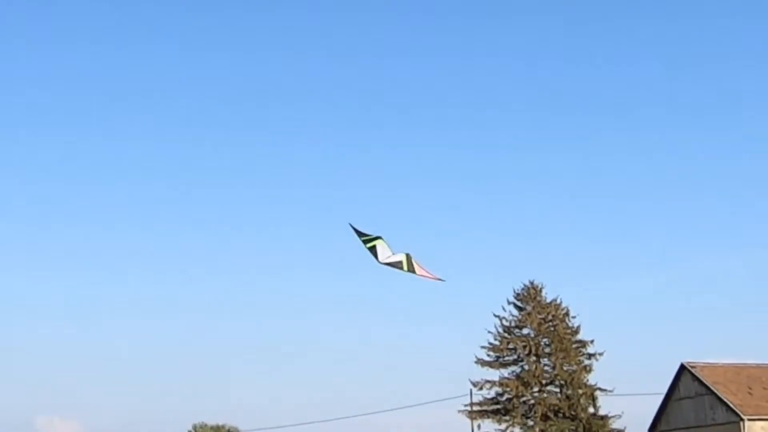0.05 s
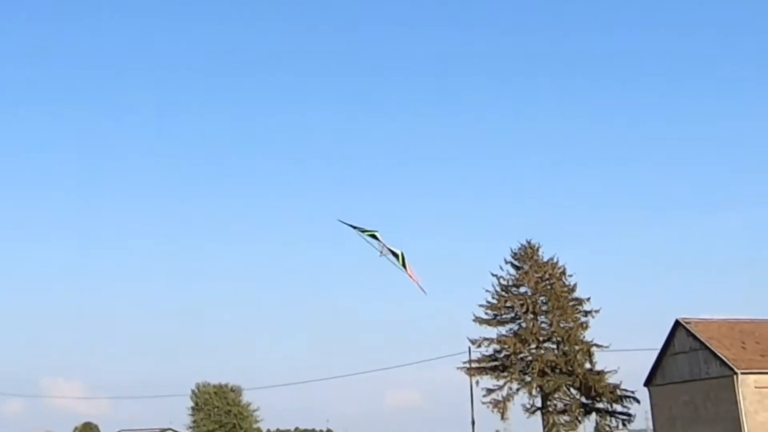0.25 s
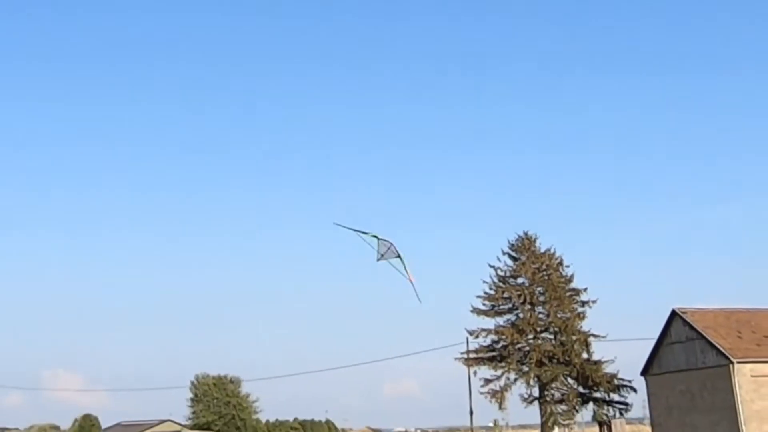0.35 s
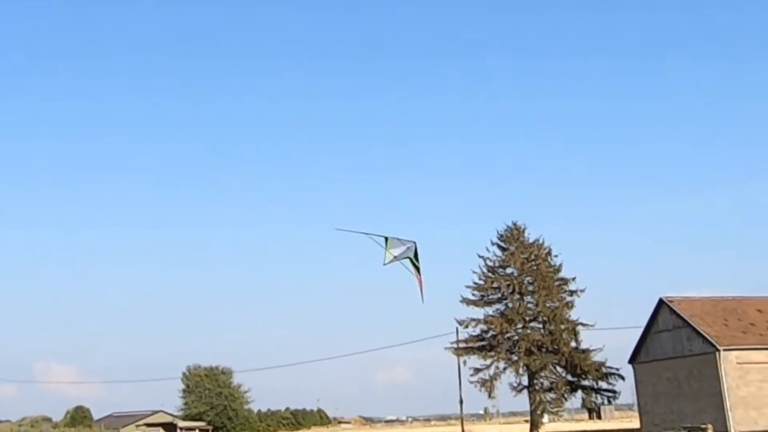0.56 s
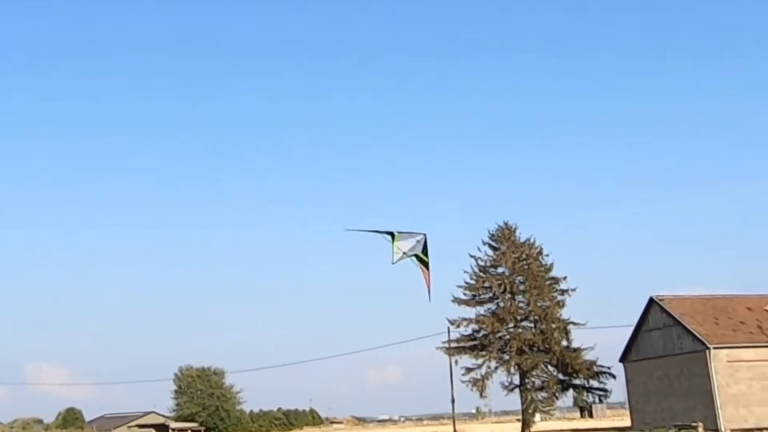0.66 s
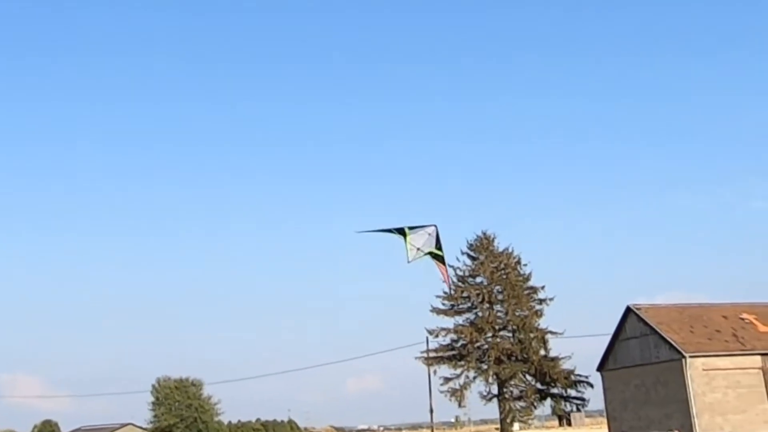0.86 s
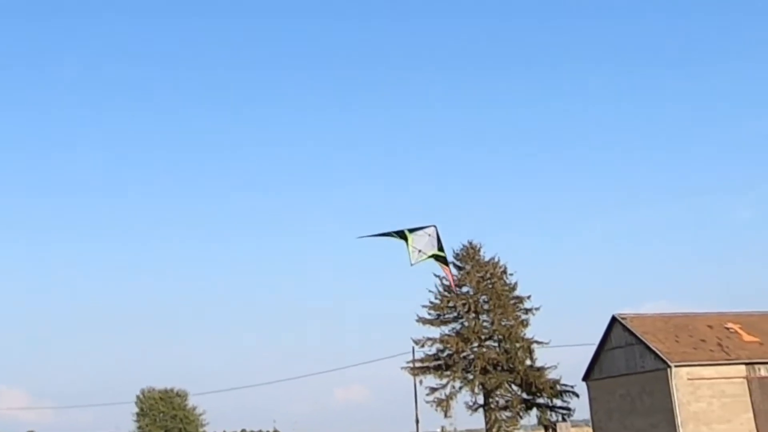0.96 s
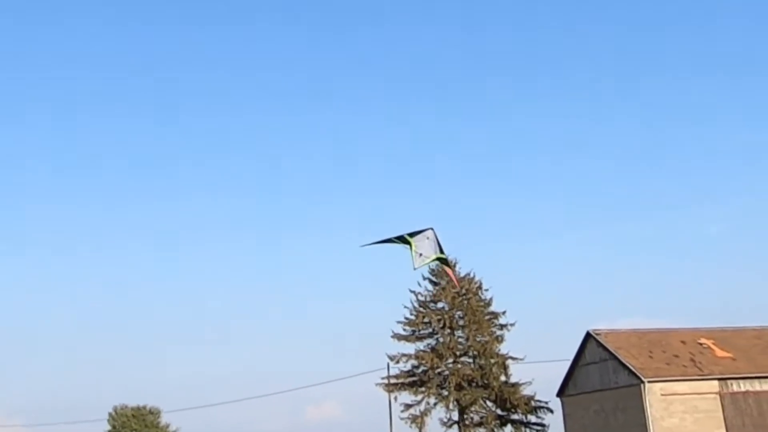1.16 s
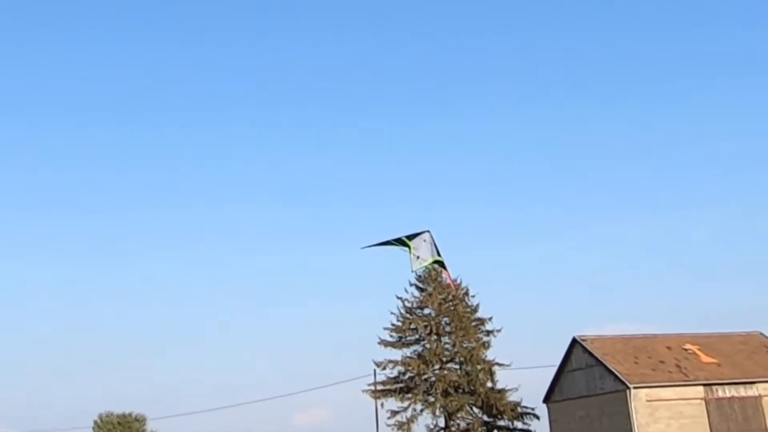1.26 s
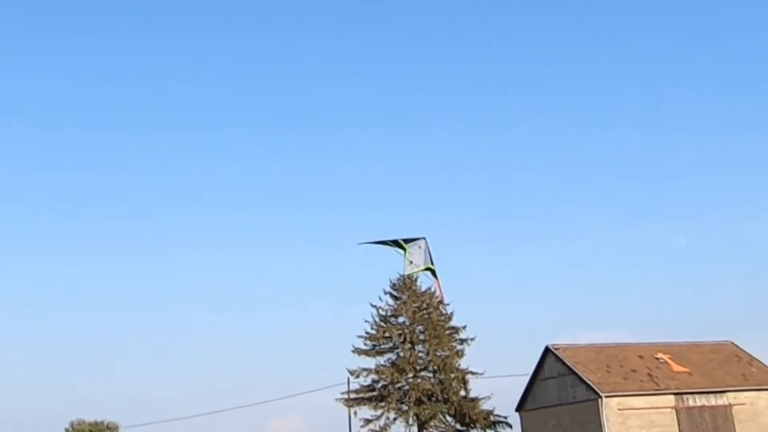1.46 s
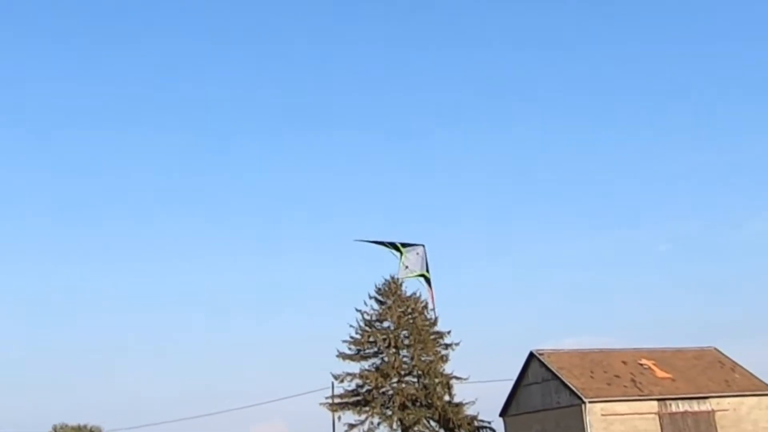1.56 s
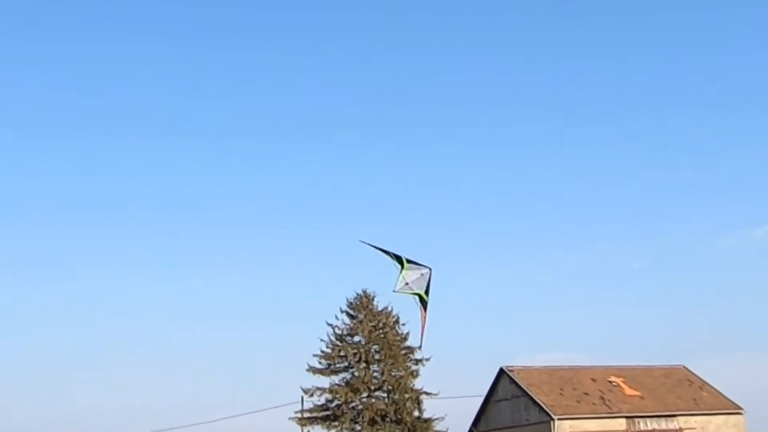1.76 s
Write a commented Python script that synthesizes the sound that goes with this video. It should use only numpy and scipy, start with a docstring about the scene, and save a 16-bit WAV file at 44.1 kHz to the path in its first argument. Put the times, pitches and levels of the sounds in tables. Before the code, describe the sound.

A stunt kite flutters over an open field, with wind buffeting the microphone.

```python
"""A stunt kite turns over an open field: its fabric rustles in swells, flaps, billows and ticks once,
and a faint whirr, probably the taut lines, sinks in pitch. Down at the microphone, gusts buffet
with a rumble that brightens as the eddies pass faster, and single eddies thump.
Faint air over the field lies behind it all."""
import sys
import numpy as np
from scipy import signal
from scipy.io import wavfile
from scipy.ndimage import uniform_filter1d

SR = 44100
rng = np.random.default_rng(int(sys.argv[2]) if len(sys.argv) > 2 else 0)


def to_wav(sig):
    """Store sig (one row per channel, or 1-D mono) as 16-bit WAV at the path in sys.argv[1].

    Samples outside -1..1 are clipped; the rate is SR.
    """
    pcm = np.clip(np.atleast_2d(sig), -1, 1) * 32767
    pcm = np.round(pcm).astype(np.int16)
    wavfile.write(sys.argv[1], SR, pcm.T)  # frames by channels


N = 79380


def from_db(db):
    return 10 ** (np.asarray(db) / 20)


def rms_one(x):
    return x / np.sqrt(np.mean(x ** 2) + 1e-20)


def in_time(rows):
    """Join rows of (t/s, values...) by straight lines: one curve for each value column."""
    times, *columns = np.transpose(rows)
    return [np.interp(np.arange(N) / SR, times, column) for column in columns]


def butter(x, hz, kind, order=2):
    """Plain low-, high- or band-pass."""
    return signal.sosfilt(signal.butter(order, hz, kind, fs=SR, output="sos"), x)


def drift(rate_hz):
    """A slow random wander with rms 1."""
    hop, settle = 40, 2000
    pole = np.exp(-2 * np.pi * rate_hz * hop / SR)
    noise = rng.standard_normal(N // hop + settle + 2)
    slow = signal.lfilter([1], [1, -2 * pole, pole * pole], noise)[settle:]
    return np.interp(np.arange(N) / hop, np.arange(len(slow)), rms_one(slow))


def resonate(x, hz, width_hz):
    """A resonance with gain 1 at its peak."""
    radius = np.exp(-np.pi * width_hz / SR)
    feedback = [1, -2 * radius * np.cos(2 * np.pi * hz / SR), radius ** 2]
    return signal.lfilter(np.array([1, 0, -1]) * (1 - radius ** 2) / 2, feedback, x + 1e-18)


def coloured(excitations, spectrum, patchy_db, flicker_hz):
    """Two unrelated excitations dealt to narrow bands, each with its own level and flicker; rms 1."""
    edges_hz = np.geomspace(150, 13000, 25)
    hz, db = np.transpose(spectrum)
    out = 0
    for k, (low, high) in enumerate(zip(edges_hz, edges_hz[1:])):
        level_db = np.interp(np.log(low * high) / 2, np.log(hz), db)
        band = butter(excitations[k % 2], [low, high], "band")
        out = out + from_db(level_db + patchy_db * drift(flicker_hz)) * band
    return rms_one(out)


def field_air():
    """Air over the open field: a faint bed of noise whose colour slowly shifts."""
    # spectral density of the air: f/Hz, relative level/dB
    spectrum = [(150, 7.5), (260, 9.5), (380, 10), (520, -21.5), (700, 1), (1000, 0), (2000, -5.5),
                (3200, -13.5), (4800, -28), (6300, -34), (7800, -41), (10000, -28.5), (12000, -49)]
    return from_db(-56.5) * coloured(rng.standard_normal((2, N)), spectrum, patchy_db=4.3, flicker_hz=4.4)


def buffeting(reference_hz=200, swell_s=0.042, evenness=0.8):
    """Frozen eddies blow past the microphone: the faster they pass, the higher the rumble reaches."""
    # wind on the microphone: t/s, level/dB
    gusts = [(0.0, -40.5), (0.034, -29.5), (0.144, -48), (0.174, -33.5), (0.334, -27), (0.354, -19),
             (0.378, -21.5), (0.422, -15.5), (0.482, -17.5), (0.498, -15), (0.662, -29), (0.736, -27.5),
             (0.796, -33.5), (0.816, -28.5), (0.892, -28.5), (0.922, -26), (0.942, -31), (0.996, -23.5),
             (1.062, -43), (1.09, -23), (1.166, -41.5), (1.196, -23), (1.226, -23.5), (1.286, -33),
             (1.306, -49), (1.326, -49), (1.376, -46), (1.406, -33), (1.464, -45.5), (1.534, -25),
             (1.574, -45), (1.64, -29), (1.66, -42), (1.69, -28), (1.76, -42), (1.79, -33)]
    # top edge of the rumble, rising with the speed of the eddies: t/s, f/Hz
    top_edge = [(0, 116.3), (.13, 104.1), (.19, 165.7), (.25, 124.6), (.29, 159.6), (.33, 278.4),
                (.46, 255.2), (.58, 280.4), (.61, 143.2), (.65, 219), (.72, 162.4), (.79, 130.1),
                (.88, 165.5), (.95, 151.8), (1.0, 182.8), (1.07, 96.5), (1.15, 85.7), (1.21, 160.9),
                (1.26, 186), (1.32, 87.3), (1.44, 110.7), (1.52, 224.3), (1.58, 122.5), (1.70, 161.8),
                (1.75, 115.5), (1.8, 238.6)]
    gust_db, = in_time(gusts)
    edge_hz, = in_time(top_edge)
    # the pattern as it sounds with the edge at reference_hz: large eddies and a skirt of small ones
    large, small = rng.standard_normal((2, 2 * N))
    pattern = butter(large, 211.3, "low", order=6) + from_db(-12) * butter(small, 300, "low", order=3)
    pattern = butter(pattern, 88, "low", order=1)  # larger eddies are stronger
    pattern = butter(pattern, 39, "high")
    travelled = SR / 10 + np.cumsum(edge_hz / reference_hz)
    eddies = rms_one(np.interp(travelled, np.arange(2 * N), pattern))
    # chance swells are mostly evened out, so the gusts set the level
    power = uniform_filter1d(eddies ** 2, int(swell_s * SR))
    swell = np.sqrt(uniform_filter1d(power, int(swell_s * SR / 2)) + 1e-6)
    force = uniform_filter1d(from_db(gust_db + 0.5), size=400)
    return force * rms_one(eddies / swell ** evenness)


def sputter(at_s=0.465, half_width_s=0.058):
    """The strongest gust breaks up into fine, rough turbulence at the microphone."""
    t = np.arange(N) / SR
    rough = rng.standard_normal(N) * from_db(1.5 * drift(60))
    swell = from_db(-39) * np.exp(-((t - at_s) / half_width_s) ** 2)
    return swell * rms_one(butter(rough, [350, 722], "band"))


def thumps():
    """An eddy passing the microphone is one dip of pressure between two smaller rises."""
    # single eddies: t/s, peak level/dB, half width/s
    eddies = [(0.355, -10, 0.0027), (0.405, -16.5, 0.00063), (.918, -16.5, 0.0021), (1.532, -25, 0.00162)]
    t = np.arange(N) / SR
    out = np.zeros(N)
    for at_s, db, half_width_s in eddies:
        offset = (t - at_s) / half_width_s
        out += from_db(db) * (offset ** 2 - 1) * np.exp(-offset ** 2 / 2)
    return out


def whirr(waver_hz=79):
    """Probably the lines overhead, shedding vortices at a rate set by airspeed: a narrow, wavering band."""
    # course of the whirr: t/s, f/Hz, level/dB
    glide = [(1.0, 563, -68), (1.26, 512.2, -54.5), (1.35, 465, -50.5), (1.40, 428.6, -50),
             (1.44, 379.8, -43), (1.51, 374.2, -51.5), (1.59, 350.7, -54.5), (1.66, 338.1, -41.5),
             (1.70, 352.7, -55), (1.73, 343, -45), (1.77, 340, -69)]
    hz, level_db = in_time(glide)
    phase = 2 * np.pi * np.cumsum(hz) / SR
    return from_db(level_db) * rms_one(drift(waver_hz) * np.cos(phase) + drift(waver_hz) * np.sin(phase))


def crinkles():
    """Brief, thin brushes of cloth in the high treble."""
    # brushes of cloth: t/s, level/dB, half width/s
    brushes = [(0.257, -60, 0.0031), (0.276, -67.5, .007), (0.33, -72, 0.0074), (.388, -69, 0.0098),
               (0.459, -65.5, .01), (1.599, -61, 0.025), (1.633, -65, 0.022)]
    t = np.arange(N) / SR
    swell = sum(from_db(db) * np.exp(-((t - at_s) / width_s) ** 2) for at_s, db, width_s in brushes)
    hiss = butter(rng.standard_normal(N), [6540, 9500], "band")
    return swell * rms_one(hiss * from_db(8.1 * drift(170)))


def tick(at_s=0.7745):
    """The fabric gives one dry click whose treble falls away gently."""
    impulse = np.zeros(N)
    impulse[int(at_s * SR)] = from_db(-14)
    return butter(butter(impulse + 1e-18, 250, "high"), 900, "low", order=1)


def billow(hz=464, width_hz=640):
    """The slack sail flutters low and unevenly."""
    # swell of the flutter: t/s, level/dB
    swell = [(1.48, -61), (1.58, -49.5), (1.64, -55), (1.685, -46.5), (1.72, -65), (1.8, -64)]
    level_db, = in_time(swell)
    body = resonate(resonate(rng.standard_normal(N), hz, width_hz), hz, width_hz)
    return from_db(level_db) * rms_one(body * from_db(6 * drift(50)))


def flaps(crumple_db=-22.5, crack_db=-29):
    """Each flap is a snap and a short crumple into a broad resonance of the cloth."""
    # flaps of the sail: t/s, peak level/dB, f/Hz, time for the crumple to fall 30 dB/s, bandwidth/f
    snaps = [(.265, -48, 2750, .012, .3), (.290, -49.5, 2420, 0.045, 0.21),
             (0.628, -43.5, 1650, 0.018, 0.31), (0.788, -37.5, 2120, .016, 0.16),
             (0.9652, -36.5, 2520, .008, 0.39), (.9845, -30, 920, .014, 0.5),
             (0.9972, -28.5, 1040, 0.02, 0.35), (1.164, -31.5, 920, 0.014, 0.35),
             (1.184, -26, 814, .006, 0.57), (1.281, -30, 790, 0.0079, 0.51),
             (1.298, -34.5, 939, 0.0048, 0.49), (1.591, -34.5, 3050, 0.044, 0.48),
             (1.642, -30.5, 463, 0.025, 0.43), (1.676, -30, 696, 0.0093, .7),
             (1.685, -33.5, 2720, 0.021, 0.34), (1.694, -53, 746, .014, 0.64)]
    out = np.zeros(N + SR)
    t = np.arange(SR // 10) / SR
    for at_s, db, hz, decay_s, width in snaps:
        push = from_db(crumple_db - 30 * t / decay_s) * rng.standard_normal(len(t))
        push[0] += 1  # the snap
        body = resonate(resonate(push, hz, width * hz), hz, 2 * width * hz)
        crack = butter(push, [1200, 4800], "band")
        flap = body / np.abs(body).max() + from_db(crack_db) * crack / np.abs(crack).max()
        start = int(at_s * SR)
        out[start:start + len(t)] += from_db(db) * flap
    return out[:N]


def rustle(creases_per_s=1200, crease_db=-2):
    """Up on the kite, sliding cloth hisses and its creases crackle, both under one trembling swell."""
    # swells of the fabric: t/s, level/dB
    swells = [(0, -67), (.25, -73.5), (.28, -64), (.33, -66.5), (.39, -59.5), (.42, -64), (.46, -65),
              (.618, -58), (.632, -48), (.68, -48.5), (.72, -54), (.78, -55.5), (.85, -64), (.886, -58),
              (.936, -65), (.97, -56), (1.02, -53), (1.07, -51.5), (1.10, -46), (1.16, -45), (1.21, -52),
              (1.27, -49.5), (1.338, -54.5), (1.426, -48.5), (1.486, -53.5), (1.55, -50.5), (1.6, -48),
              (1.655, -51.5), (1.685, -49), (1.715, -54.5), (1.78, -65)]
    # spectral density of the cloth: f/Hz, relative level/dB
    cloth = [(250, -7.5), (450, -6.5), (800, -9), (1300, -7), (1800, -9.5), (2600, -10), (3400, -11.5),
             (4200, -17), (5100, -17), (6300, -24), (7600, -22), (8600, -36.5), (9700, -36), (11500, -40.5)]
    level_db, = in_time(swells)
    hiss = coloured(rng.standard_normal((2, N)), cloth, patchy_db=-1.0, flicker_hz=35)
    size_db = 7.4 * np.minimum(rng.exponential(1, (2, N)), 3)
    signs = rng.choice([-1, 1], (2, N))
    buckles = rng.random((2, N)) < creases_per_s / SR
    creases = coloured(from_db(size_db) * signs * buckles, cloth, patchy_db=0.5, flicker_hz=75)
    return from_db(level_db + drift(32)) * (hiss + from_db(crease_db) * creases)


def scene():
    """One microphone in the field, with the wind right on it and the kite overhead."""
    air = field_air()
    wind = buffeting() + sputter() + thumps()
    kite = rustle() + flaps() + tick() + billow() + whirr() + crinkles()
    return (air + wind + kite)[None]


def record(dry, dip_depth=0.58, cutoff_hz=10300):
    """The microphone has a dip in the treble; the top is cut steeply."""
    dipped = dry - dip_depth * resonate(dry, hz=6230, width_hz=1300)
    return signal.sosfilt(signal.ellip(8, .1, 70, cutoff_hz, fs=SR, output="sos"), dipped)


dry = scene()
out = record(dry)
to_wav(out)
```